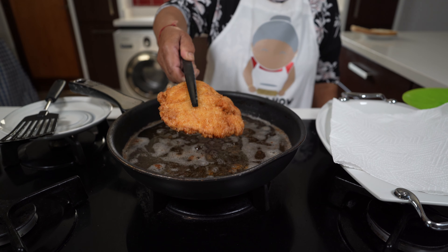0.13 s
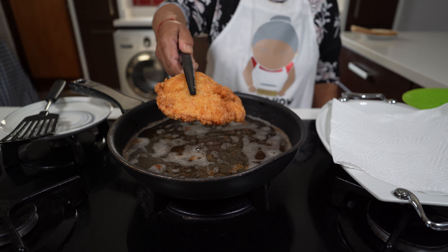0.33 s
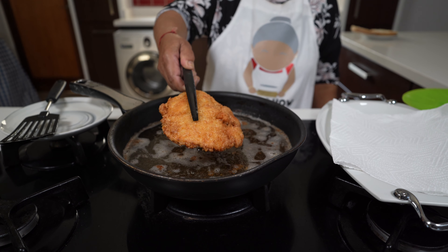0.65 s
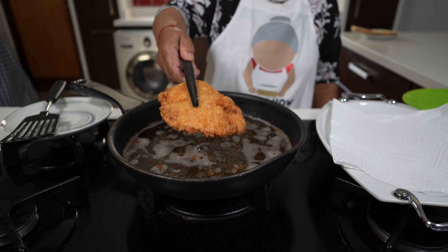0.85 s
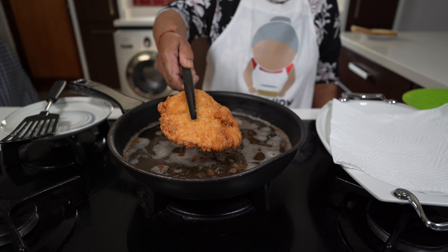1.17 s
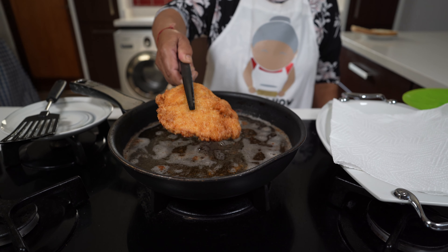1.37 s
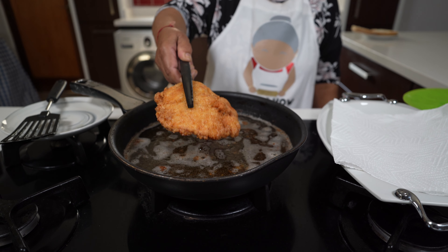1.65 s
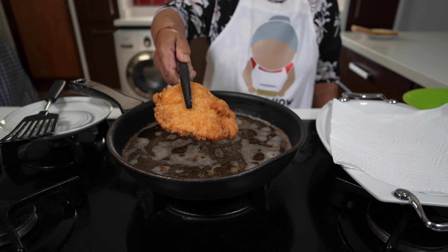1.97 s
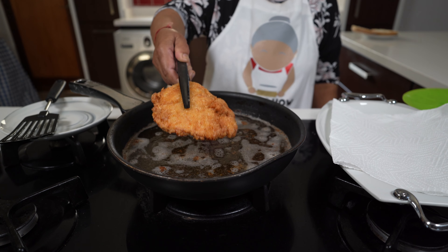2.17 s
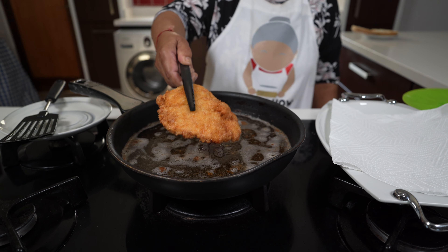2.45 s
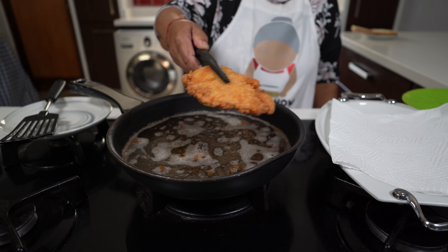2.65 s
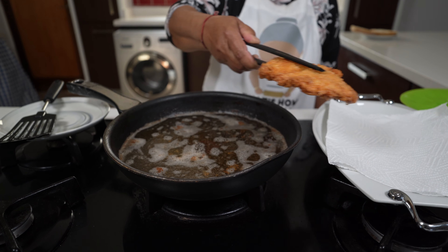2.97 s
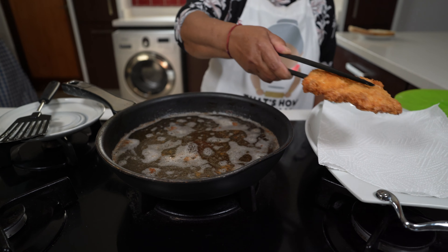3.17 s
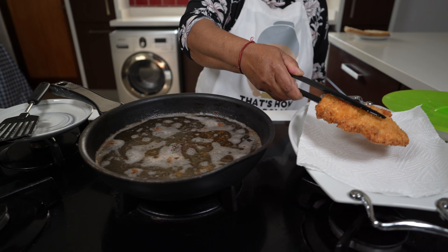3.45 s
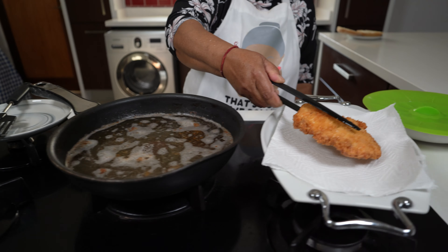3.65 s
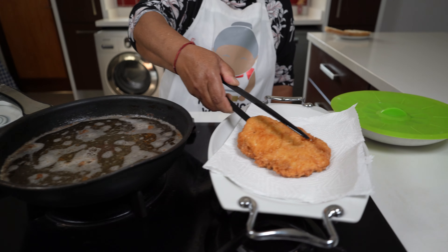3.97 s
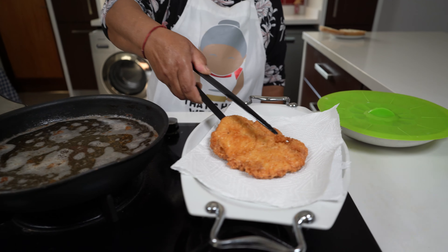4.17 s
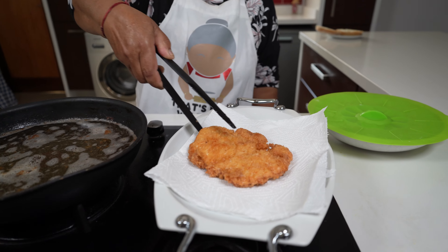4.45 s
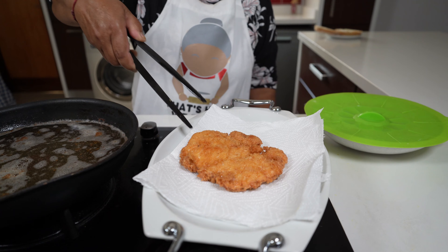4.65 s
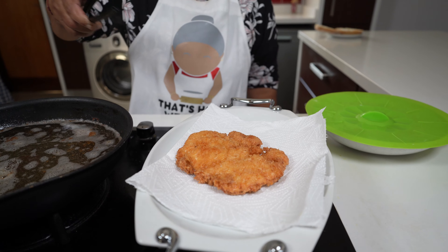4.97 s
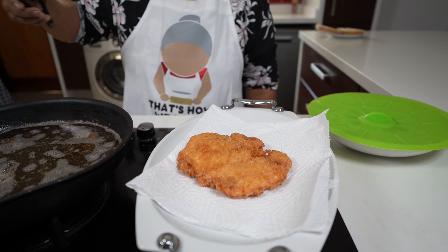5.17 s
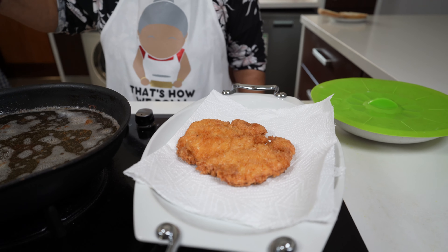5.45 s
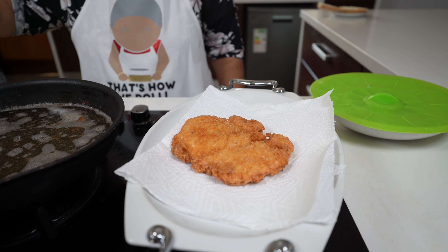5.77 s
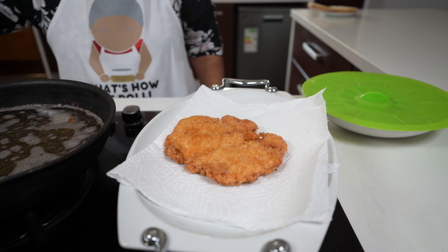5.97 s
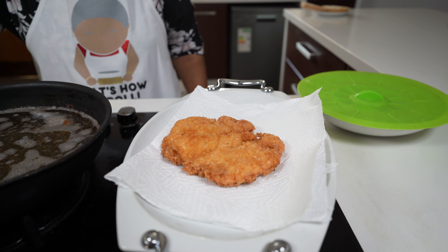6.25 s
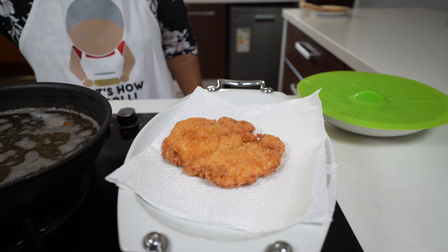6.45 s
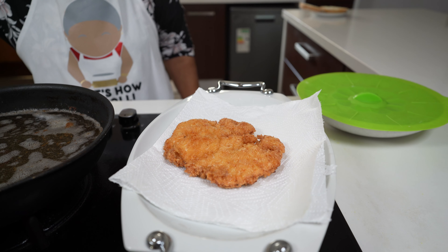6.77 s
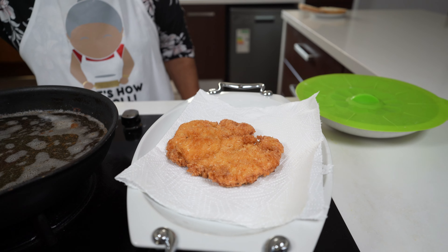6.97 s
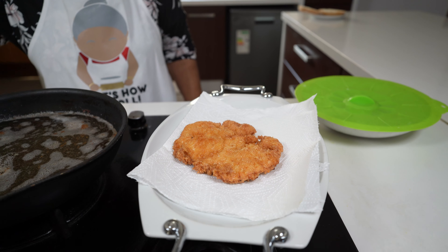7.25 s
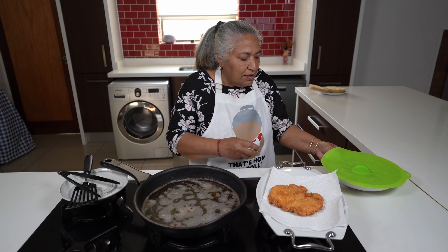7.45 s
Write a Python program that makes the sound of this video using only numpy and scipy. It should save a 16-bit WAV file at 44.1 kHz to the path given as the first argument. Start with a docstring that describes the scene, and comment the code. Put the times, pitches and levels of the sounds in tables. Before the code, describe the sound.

Close to a frying pan, shallow oil crackles with dense wet pops, tiny ticks and thin fizz, slowly calming. A sharp spit snaps at about two seconds. A faint shuffle and slight paper crumble follow as a breaded cutlet is laid down. Later come small dish knocks. At the end the frying abruptly sounds far away and a lid slides, bumps dully and rings briefly. Small kitchen, low hum beneath.

```python
"""A kitchen: shallow oil crackles in a frying pan as a breaded cutlet is lifted out and laid on paper.
Each steam bubble is a burst ringing a damped cavity, echoed by the pan wall; shaped noise makes the wash,
and random clicks the fizz. Sharp spits stand out, a dish is knocked, and sparse reflections form the room.
Mains hum, rumble and room tone lie beneath. Near the end the pan drops as if heard from much farther off,
and a lid slides, bumps and rings."""
import sys
import numpy as np
from scipy import signal
from scipy.fft import rfft, irfft
from scipy.io import wavfile

SR = 44100
rng = np.random.default_rng(int(sys.argv[2]) if len(sys.argv) > 2 else 0)


def output_pcm(signal):
    """Save a mono or channel-first signal as 16-bit PCM at the path in sys.argv[1].

    Samples are clipped to [-1, 1] before scaling.
    """
    pcm = np.clip(np.atleast_2d(signal).T, -1, 1) * 32767
    wavfile.write(sys.argv[1], SR, np.round(pcm).astype(np.int16))


N = 336042
TIME = np.arange(N) / SR

# the oil calms as it goes: bubbles weaken (dB per s) and shift in pitch (octaves per s)
CALM_DB_PER_S, PITCH_RISE_OCT_PER_S = 0.31, 0.027
# the cutlet is swung over, then lands on the paper (s)
CARRY_S, LAND_S = 2.87, 3.98


# bubbles that stand out from the crackle: [t/s, energy level/dB, f/Hz, resonance Q]
LOUD_POPS = [(0.0712, -5.5, 1540, 3.8), (0.0826, -6.5, 3300, 5.8), (0.0987, -5, 1120, 2.3),
             (0.1043, -4, 1370, 8.7), (0.3133, -5.0, 3340, 18.4), (0.429, -8.5, 1620, 3.2),
             (0.4894, -12.5, 3380, 20), (0.5018, -9.5, 1990, 4.4), (0.6183, -12, 2030, 2.7),
             (0.6294, -6.5, 2900, 12), (0.7695, -12, 2190, 22), (0.8184, -12.5, 1800, 5.3),
             (0.8918, -10.5, 1320, 3.4), (0.944, -11, 3000, 5), (1.117, -7, 2220, 7.2),
             (1.1792, -11.0, 2120, 9.5), (1.2052, -7.0, 2500, 7.1), (1.2925, -4.5, 2150, 6.6),
             (1.323, -8.0, 3436, 13), (1.4024, -8, 1420, 3.6), (1.4113, -6.5, 1600, 3.6),
             (1.4573, -9.5, 1480, 3.9), (1.5188, -5.5, 1842, 8.4), (1.5918, -9, 1640, 4.8),
             (1.6579, -10, 2020, 2.1), (1.722, -11, 3100, 3.7), (1.7333, -12.5, 3140, 8),
             (1.8601, -6.0, 1820, 8), (1.9045, -10, 2120, 8), (1.942, -6, 948, 1.03),
             (2.1675, -9, 1700, 1.3), (2.22, -8.0, 2500, 1.6), (2.2872, -12.5, 3195, 10),
             (2.3651, -10.0, 2084, 5.8), (2.4409, -8, 2547, 7), (2.4667, -4.5, 1330, 2.1),
             (2.5329, -8.5, 3420, 11), (2.565, -4, 1760, 6.4), (2.5822, -5.0, 2940, 4.4),
             (2.6095, -7.5, 2290, 13), (2.6912, -10.5, 2800, 4), (2.729, -8, 1740, 2.7),
             (2.7982, -9.5, 2060, 8.9), (2.8402, -11.5, 3220, 13.5), (2.8686, -9.5, 2270, 6),
             (2.8758, -7.0, 1880, 3), (3.0167, -9.0, 1930, 1.7), (3.0217, -7, 3310, 5.7),
             (3.0529, -7.0, 2480, 1.6), (3.0579, -9, 1500, 8), (3.1331, -9.5, 2950, 9.1),
             (3.1792, -7.5, 2690, 9.8), (3.2233, -13.5, 2770, 1.25), (3.3528, -5, 1823, 2.6),
             (3.3602, -8.5, 2750, 1.3), (3.4768, -10.5, 2310, 5.4), (3.5343, -12, 2286, 2.7),
             (3.6305, -11.0, 1820, 5), (3.6408, -9, 2110, 4.6), (3.6838, -9.5, 2624, 5.8),
             (3.82, -2.5, 2030, 3.5), (3.8898, -5.0, 1572, 2.7), (3.9171, -11.5, 3850, 3.5),
             (3.955, -9, 1867, 3.7), (4.045, -4.0, 3420, 12), (4.1347, -7.5, 2546, 23),
             (4.1532, -6.5, 2670, 7.7), (4.1682, -10.5, 2280, 5.3), (4.1915, -7, 1600, 1.5),
             (4.1968, -3.0, 1570, 10), (4.2742, -7.0, 3640, 5), (4.3045, -7, 1683, 5),
             (4.3288, -8.5, 3860, 5.6), (4.3363, -4.0, 2556, 10), (4.452, -3.5, 1820, 4.4),
             (4.571, -12, 2020, 3.6), (4.7063, -10, 3580, 12), (4.739, -9.5, 3077, 6),
             (4.8475, -8.0, 2100, 6.2), (4.9841, -12.0, 1802, 3.6), (5.2284, -13.5, 2940, 2.76),
             (5.2552, -10, 1823, 5.3), (5.3425, -5, 2503, 4.5), (5.5163, -10.5, 3956, 17),
             (5.5408, -8.5, 2258, 5.2), (5.5667, -9.5, 3500, 12), (5.6322, -7, 3070, 2.9),
             (5.7264, -13, 1970, 2.7), (5.7309, -8, 1944, 4), (5.748, -2.5, 2720, 10.8),
             (5.797, -9, 1999, 2.9), (5.8965, -12.0, 2753, 3.3), (6.1022, -13, 3220, 2.7),
             (6.2116, -10, 2340, 2.9), (6.2306, -8.5, 1708, 1.4), (6.2708, -8.5, 2805, 7.1),
             (6.298, -10.5, 3080, 8), (6.4294, -5.5, 2960, 8.9), (6.569, -10, 3010, 2.74),
             (6.6298, -6.5, 2780, 5.6), (6.6462, -9, 2580, 2.8), (6.7885, -7.5, 2960, 6.6),
             (6.808, -5, 3655, 15.6), (6.8574, -6, 3500, 7.2), (7.0875, -7, 1942, 6.5),
             (7.1153, -11, 3240, 2), (7.1304, -12.0, 4200, 5), (7.2165, -9, 1790, 5.3),
             (7.445, -20.5, 5090, 2.4), (7.5742, -15.5, 2670, 5)]
# pitch quantiles before the drift, evenly spaced, of the middling, lesser and tiny bubbles: [f/Hz]
SIMMER_PITCHES = [1540, 2100, 2470, 2950, 3510, 4820]
LESSER_PITCHES = [1400, 2330, 2460, 3000, 3550, 5540]
TINY_PITCHES = [4400, 5020, 6800, 10050]
# spectrum of the wash of the whole pan: [f/Hz, relative level/dB per Hz]
WASH_SPECTRUM = [(100, -22), (240, -1), (380, -4), (1000, 3), (1200, -4), (1900, 2.5), (3500, 2.5),
                 (5000, -5), (7000, -11), (16000, -29)]
# spectrum of the fizzing foam: [f/Hz, relative level/dB per Hz]
FIZZ_SPECTRUM = [(2000, -51.5), (4500, -37), (6500, -11), (8500, 3), (12500, 7.5), (15500, -2)]
# fizz level before the pan becomes distant: [t/s, level/dB]
FIZZ_LEVEL = [(0, -62.5), (1.3, -61), (2.9, -61.5), (3.8, -66.5), (5.2, -64), (7.3, -64.5)]


def frying():
    """Loud pops, steady bubbling, lesser pops, tiny ticks, the wash of the whole pan and its foam's fizz."""
    far_s, far_db = 7.329, -22  # the bed of the pan becomes distant
    near = level([(far_s - .002, 0), (far_s + .002, far_db)])
    loud_rows = list(LOUD_POPS) + gurgles() + flurries()
    loud = bubbles(loud_rows, opening_s=0.0004, splash_db=-3.5, splash_s=0.0024, echo_db=-19)
    simmer_rows = random_bubbles(SIMMER_PITCHES, per_s=22, top_db=-11.3, range_db=7, sharpness=4.5)
    simmer = bubbles(simmer_rows, opening_s=0.00035, splash_db=-4.5, splash_s=0.0032, echo_db=-19)
    lesser_rows = random_bubbles(LESSER_PITCHES, per_s=125, top_db=-16.0, range_db=15.5, sharpness=5.1)
    lesser = bubbles(lesser_rows, opening_s=0.000081, splash_db=-2, splash_s=0.0023, echo_db=-12.0)
    tiny_rows = random_bubbles(TINY_PITCHES, per_s=75, top_db=-21.5, range_db=21.5, sharpness=8.0)
    tiny = bubbles(tiny_rows, opening_s=.00025, splash_db=-1.5, splash_s=0.0006, echo_db=-13)
    # oil dripping off the cutlet stirs the pan
    flare = 1 + swell(CARRY_S, db=-2.5, rise_s=.11, fall_db_per_s=14)
    pops = loud + (simmer + (lesser + tiny) * flare) * near
    wash = amp(-55.0 - CALM_DB_PER_S * TIME) * noise(WASH_SPECTRUM) * flare
    fizz = crackle(FIZZ_SPECTRUM, per_s=5500, spread_db=4.0) * level(FIZZ_LEVEL)
    cracks = spits(snap_s=0.00015, spray_db=-15, spray_s=0.0023)
    reflections = amp(-10.5) * kitchen(pops + .2 * cracks)
    # loud pops and spits stay direct; everything else drops with the distance
    return pops + cracks + near * (wash + fizz + reflections)


# how oil and pan colour every pop: [f/Hz, level/dB]
PAN_COLOUR = [(200, -4.5), (420, -2), (550, 2), (680, -3), (950, 4), (1150, -1), (1900, 2.5), (2800, -1.5),
              (3500, 2), (5000, -2), (6300, -9.5), (9000, -16), (15000, -12)]


def bubbles(rows, opening_s, splash_db, splash_s, echo_db):
    """A bubble's film opens and splashes; its cavity rings for a few cycles, and the pan wall echoes it."""
    out, t = np.zeros(N), np.arange(1024) / SR
    lead = 32  # samples of silence before each pop, so that its soft start is kept whole
    f = np.fft.rfftfreq(len(t), 1 / SR) + 1
    pan = amp(read(PAN_COLOUR, f))
    for s, db, hz, q in rows:
        size = 2500 / hz  # large bubbles are low and splash longer
        cavity = 1 / (1 + 1j * q * (f / hz - hz / f))
        film = rng.standard_normal(len(t)) * np.exp(-t / (splash_s * size))
        wet = amp(splash_db + 3.2 * rng.standard_normal())  # some burst cleanly, some splutter
        burst = rng.choice([-1, 1]) + wet * rfft(film / np.linalg.norm(film))
        # four echoes of random sign
        delay_s = rng.uniform(0.001048, .006, size=(4, 1))
        echoes = rng.choice([-1, 1], size=4) @ np.exp(-2j * np.pi * f * delay_s)
        walls = 1 + amp(echo_db) * echoes
        opening = 1 - np.exp(-t / (opening_s * size * rng.uniform(0.048, 2.5)))
        pop = irfft(burst * cavity * walls) * opening
        pop = irfft(rfft(np.roll(pop, lead)) * pan)
        add(out, s - lead / SR, amp(db) * pop / np.linalg.norm(pop))
    return out


def gurgles(count=8):
    """Rows for the daughter bubbles that follow each large pop, near its pitch and ever weaker."""
    below_hz, length_s = 1700, .14  # pops lower than this break up, over this long
    under_db, fall_db_per_s = -16, 57  # level against the parent, and how it falls
    rows = []
    for s, db, hz, q in LOUD_POPS:
        when, pitch = rng.random((2, count))
        if hz < below_hz:
            after = length_s * (np.arange(count) + when) / count
            energy_db = db + under_db - fall_db_per_s * after
            rows += zip(s + after, energy_db, hz * (0.81 + .45 * pitch), [q] * count)
    return rows


# patches of foam that collapse: [start t/s, energy level of each bubble/dB, centre f/Hz]
FOAM_FLURRIES = [(0.236, -16, 2380), (0.53, -18, 3330), (1.33, -18, 3370), (1.925, -18.5, 3440),
                 (2.9, -15, 2900), (3.96, -16.5, 3500), (5.19, -16, 3705), (6.05, -18.5, 3550),
                 (6.16, -13, 2880), (7.0, -17.5, 3380)]


def flurries(count=5):
    """Rows for foam collapsing in small bubbles in quick succession, scattered in pitch."""
    length_s, scatter_oct, q = .07, 0.42, 4.7
    rows = []
    for s, db, hz in FOAM_FLURRIES:
        when, pitch = rng.random((2, count))
        after = length_s * (np.arange(count) + when) / count
        rows += zip(s + after, [db] * count, hz * 2 ** (scatter_oct * (2 * pitch - 1)), [q] * count)
    return rows


def random_bubbles(pitches, per_s, top_db, range_db, sharpness, count=2000):
    """Rows for a crowd of mostly weak bubbles, each early or late on an even flow of steam."""
    when, strength, pitch, ringing = rng.random((count, 4)).T
    s = (np.arange(count) + 2 * when - .5) / per_s
    late = s - N / SR / 2  # the drifts are zero halfway through
    db = top_db - range_db * np.sqrt(strength) - CALM_DB_PER_S * late
    hz = np.interp(pitch, np.linspace(0, 1, len(pitches)), pitches)
    hz = hz * 2 ** (PITCH_RISE_OCT_PER_S * late)
    size = 2500 / hz  # large bubbles are the most damped
    q = sharpness / np.maximum(size, np.sqrt(size)) * (0.57 + 0.93 * ringing)
    # the random bubbles pause for a moment before each loud pop, so that its onset stands clear
    pause_s = .014
    wait = np.array(LOUD_POPS)[:, 0] - s[:, None]
    paused = ((wait > 0) & (wait < pause_s)).any(axis=1)
    return np.c_[s, db, hz, q][(s < N / SR) & ~paused]


def crackle(spectrum, per_s, spread_db):
    """Tiny clicks at random moments, most weak and a few strong, coloured and set to rms 1."""
    size = amp(spread_db * np.minimum(rng.exponential(1, N), 5)) * rng.choice([-1, 1], N)
    return colour(size * (rng.random(N) < per_s / SR), spectrum)


# sharp spits of oil, each cracking 1.5 ms after its t: [t/s, peak level/dB]
OIL_SPITS = [(0.9358, -34), (1.057, -30), (1.3583, -29), (1.9071, -26), (2.0286, -12.5), (2.804, -25),
             (2.922, -28)]
# spectrum of a spit: [f/Hz, relative level/dB per Hz]
SPIT_SPECTRUM = [(100, -55), (3000, -15), (8000, -11), (11000, -5.5), (14000, -3), (17000, -6)]


def spits(snap_s, spray_db, spray_s):
    """A drop of water flashes to steam: a very short crack and a little spray."""
    out, t = np.zeros(N), np.arange(-64, 1000) / SR
    for s, db in OIL_SPITS:
        shape = (t >= 0) * (np.exp(-abs(t) / snap_s) + amp(spray_db) * np.exp(-abs(t) / spray_s))
        crack = colour(rng.standard_normal(len(t)) * shape, SPIT_SPECTRUM)
        add(out, s, amp(db) * crack / abs(crack).max())
    return out


# spectrum of the carrying shuffle: [f/Hz, relative level/dB per Hz]
SHUFFLE_SPECTRUM = [(80, -4), (220, 8.5), (420, -10), (700, 6.5), (2500, -23)]
# spectrum of crumbs on paper: [f/Hz, relative level/dB per Hz]
PAPER_SPECTRUM = [(1000, -8), (4500, 6), (7000, 11), (9000, -28), (15000, -34)]


def handling():
    """A shuffle as the cutlet is carried over, crumbs on paper, knocks and a lid."""
    shuffle = noise(SHUFFLE_SPECTRUM) * swell(CARRY_S, db=-57.5, rise_s=0.21, fall_db_per_s=17.5)
    crumbs = crackle(PAPER_SPECTRUM, per_s=58, spread_db=4.5)
    paper = crumbs * swell(LAND_S, db=-53.5, rise_s=0.056, fall_db_per_s=25)
    direct = shuffle + paper + knocks(contact_s=0.013) + lid(ring_db=-50)
    return direct + amp(-7.5) * kitchen(direct)


# knocks on a dish: [t/s, ring gain/dB, contact gain/dB, extra damping by the hand/dB per s]
DISH_KNOCKS = [(6.462, -43, -47, 400), (6.66, -50.5, -53, 250), (6.909, -42.5, -33.5, 33)]
# modes of the dish, before the hand damps it: [f/Hz, relative level/dB, t60/s]
DISH_MODES = [(237.9, -2.5, 0.18), (300, -7.5, 0.12), (530, -12.5, .36), (900, -2.5, 0.31), (950, -5, 0.27),
              (970, -8, 0.23), (2150, -10, .25), (3500, -1, .35)]


def knocks(contact_s):
    """A short burst of contact noise, and the dish rings on under the hand."""
    out, t = np.zeros(N), np.arange(SR // 2) / SR
    ring = modes(DISH_MODES, t)
    for s, ring_db, contact_db, damping in DISH_KNOCKS:
        contact = colour(rng.standard_normal(len(t)), [(200, -13.5), (1900, 7), (3600, -2), (7000, -44)])
        damped = amp(ring_db - damping * t) * ring
        add(out, s, damped + amp(contact_db) * contact * np.exp(-t / contact_s))
    return out


# spectrum of the lid's slide and thud: [f/Hz, relative level/dB per Hz]
THUD_SPECTRUM = [(150, -9), (340, 0), (490, -2), (600, -1), (720, -8), (1000, -4), (1300, -21), (4000, -37)]
# modes of the lid and its bowl: [f/Hz, relative level/dB, t60/s]
LID_MODES = [(349, 1, 0.26), (597, -13, 0.095), (967, -7, .2)]


def lid(ring_db):
    """A lid slides on its bowl, bumps with a dull thud and rings briefly."""
    slide_s, bump_s = 7.475, 7.509
    ring = modes(LID_MODES, np.maximum(TIME - bump_s, 0))  # silent until the bump
    slide = swell(slide_s, db=-55, rise_s=0.14, fall_db_per_s=80)
    bump = swell(bump_s, db=-44.5, rise_s=0.0091, fall_db_per_s=1290)
    return noise(THUD_SPECTRUM) * (slide + bump) + amp(ring_db) * ring


# kitchen reverberation: [f/Hz, t60/s]
KITCHEN_DECAY = [(200, 0.54), (1200, 0.62), (4000, 0.18), (12000, 0.75)]


def kitchen(x):
    """Sparse reflections of random sign, each band dying at its own speed."""
    length = SR // 2
    after_gap = np.arange(length) > .007 * SR
    taps = rng.choice([-1, 1], length) * (rng.random(length) < .08) * after_gap
    hz, t, z = signal.stft(taps, SR, nperseg=256)
    decay = amp(-60 * t / read(KITCHEN_DECAY, hz)[:, None])
    tail = signal.istft(z * decay, SR)[1]
    return signal.fftconvolve(x, tail / np.linalg.norm(tail))[:N]


# mains hum before the microphone's move sets its gain: [f/Hz, rms level/dB]
HUM_PARTIALS = [(50, -56), (150, -75), (250, -76)]
# spectrum of the deep rumble: [f/Hz, relative level/dB per Hz]
RUMBLE_SPECTRUM = [(8, -23), (22, -1.5), (55, -26), (300, -77)]
# spectrum of the quiet room: [f/Hz, relative level/dB per Hz]
ROOM_SPECTRUM = [(80, 1), (700, -5), (1600, -9), (5000, -8.5), (8000, -20), (16000, -19)]
# start and end of the microphone's move across to the plate: [t/s, t/s]
MIC_MOVE = (2.62, 3.83)


def background():
    """Steady mains partials and deep rumble that grow with the microphone's move, over room tone."""
    moved = np.interp(TIME, MIC_MOVE, [0, 1])
    hum = np.zeros(N)
    for hz, db in HUM_PARTIALS:
        hum += amp(db) * np.sqrt(2) * np.sin(2 * np.pi * (hz * TIME + rng.random()))
    hum = hum * amp(-3 + 5.2 * moved)
    rumble = noise(RUMBLE_SPECTRUM) * amp(-58.0 + 9.7 * moved)
    return hum + rumble + amp(-63.5) * noise(ROOM_SPECTRUM)


def amp(db):
    """Decibels to gain."""
    return 10 ** (np.asarray(db) / 20)


def unit(x):
    """Scales to rms 1."""
    return x / np.sqrt(np.mean(x ** 2) + 1e-20)


def read(points, hz):
    """Reads a table on a log-frequency axis."""
    f, value = np.transpose(points)
    return np.interp(np.log(hz + 1), np.log(f + 1), value)


def level(curve):
    """A dB curve as a gain for every sample."""
    return amp(np.interp(TIME, *np.transpose(curve)))


def swell(peak_s, db, rise_s, fall_db_per_s):
    """A gain that rises to its peak and then dies away."""
    since = TIME - peak_s
    rise = np.clip(1 + since / rise_s, 0, 1) ** 2
    return rise * amp(db - fall_db_per_s * np.maximum(since, 0))


def modes(table, t):
    """Sums decaying sines, one for each resonance of a struck object."""
    return sum(amp(db - 60 * t / t60) * np.sin(2 * np.pi * hz * t) for hz, db, t60 in table)


def colour(x, spectrum):
    """Gives x a spectrum, at rms 1."""
    gain = amp(read(spectrum, np.fft.rfftfreq(len(x), 1 / SR)))
    return unit(irfft(rfft(x) * gain, len(x)))


def noise(spectrum):
    """Steady noise with a spectrum, at rms 1."""
    return colour(rng.standard_normal(N), spectrum)


def add(mix, s, sound):
    """Mixes a sound in at a time."""
    part = mix[max(0, round(s * SR)):][:len(sound)]
    part += sound[:len(part)]


def scene():
    """Pan, handling and background summed at one microphone."""
    return (frying() + handling() + background())[None]


def record(dry):
    """A steep low-pass limits the treble."""
    edge_hz = 16000
    lowpass = signal.firwin(511, edge_hz, window=("kaiser", 9), fs=SR)
    return signal.oaconvolve(dry, lowpass[None], "same")


dry = scene()
out = record(dry)
output_pcm(out)
```